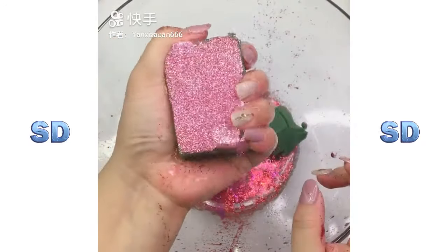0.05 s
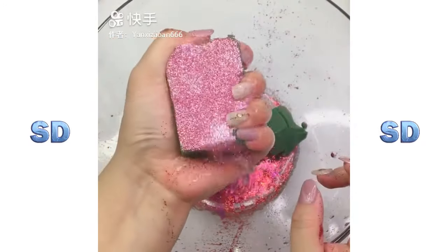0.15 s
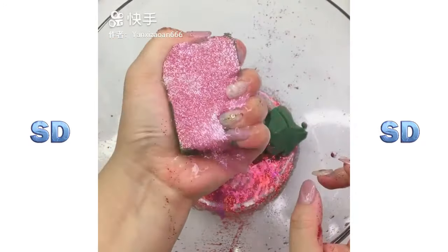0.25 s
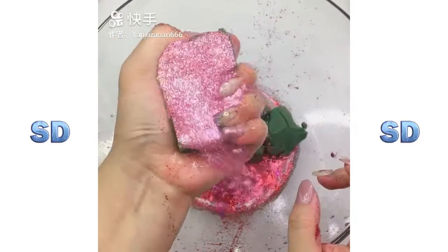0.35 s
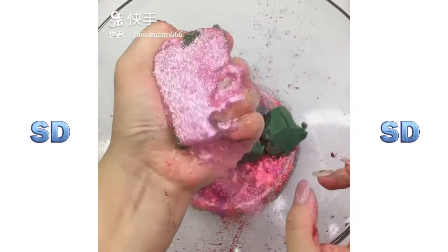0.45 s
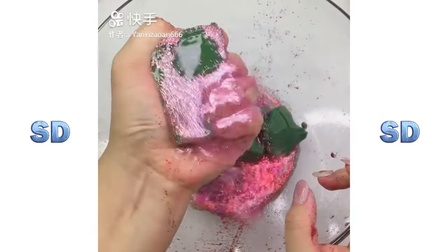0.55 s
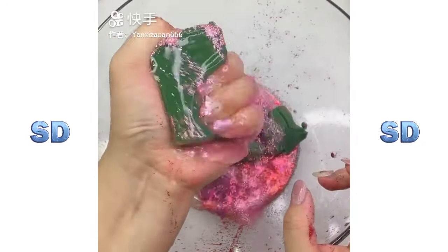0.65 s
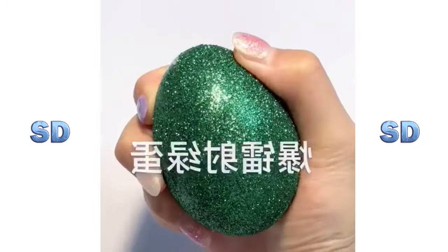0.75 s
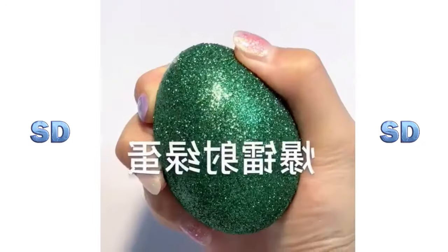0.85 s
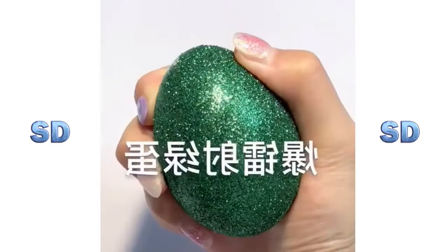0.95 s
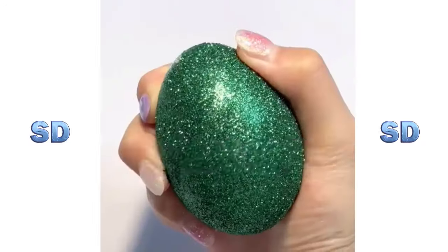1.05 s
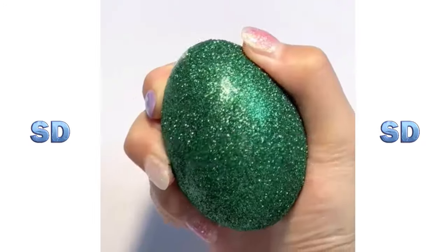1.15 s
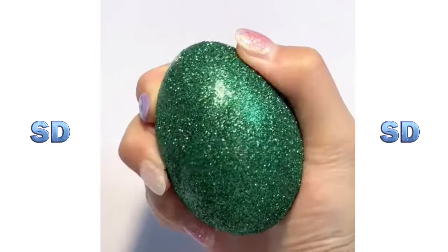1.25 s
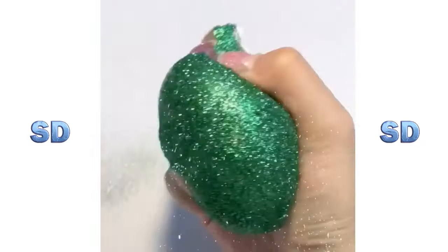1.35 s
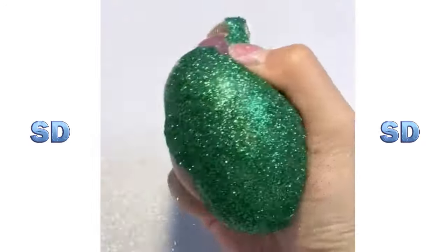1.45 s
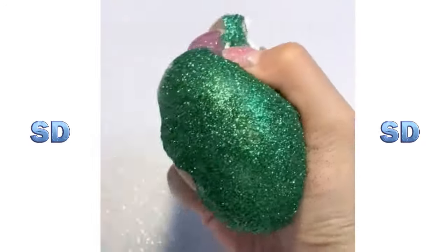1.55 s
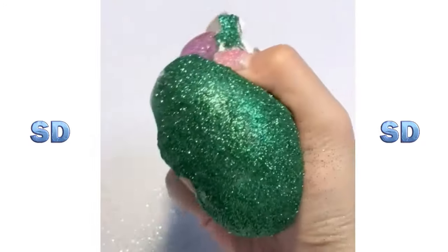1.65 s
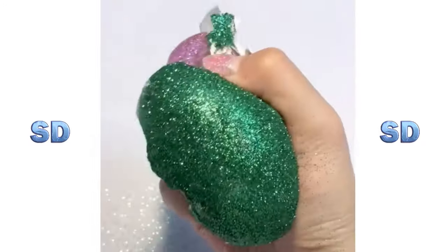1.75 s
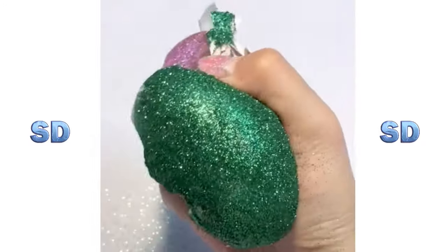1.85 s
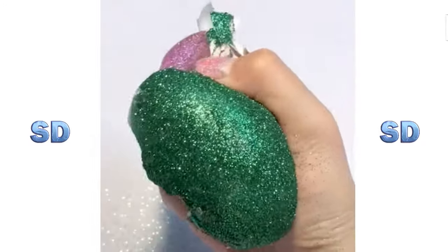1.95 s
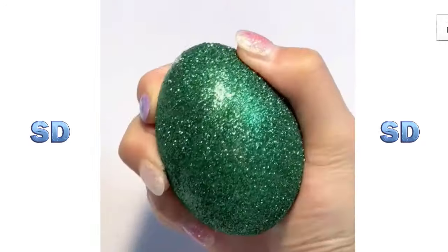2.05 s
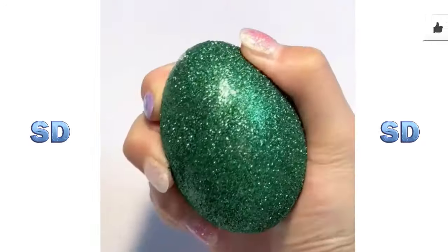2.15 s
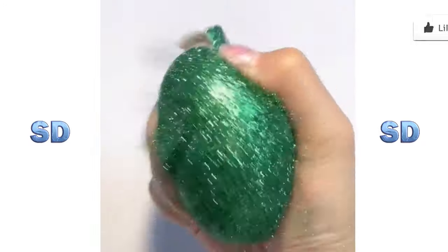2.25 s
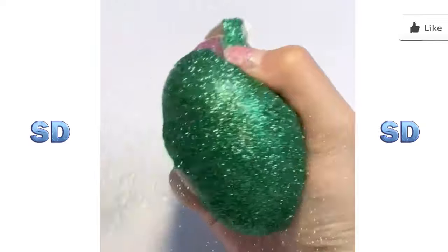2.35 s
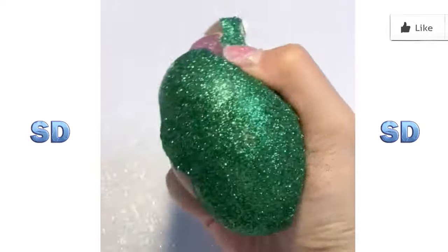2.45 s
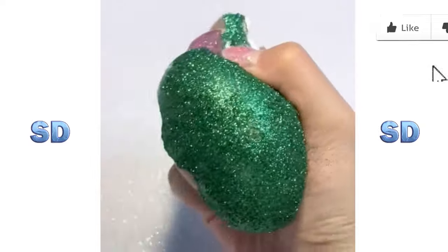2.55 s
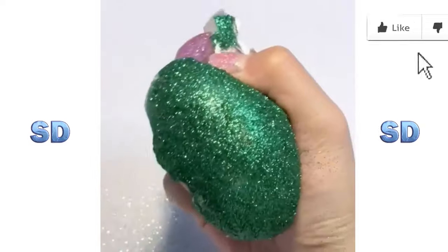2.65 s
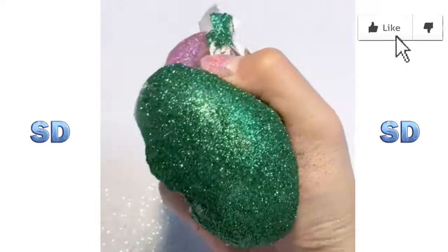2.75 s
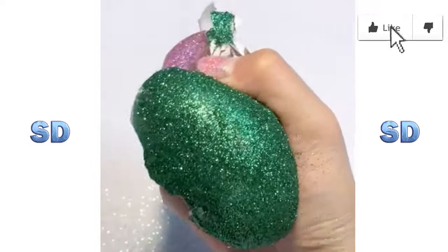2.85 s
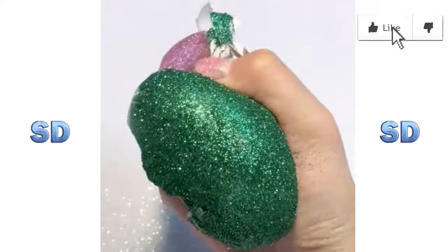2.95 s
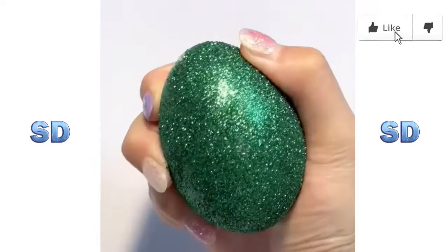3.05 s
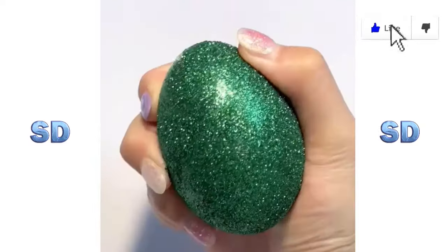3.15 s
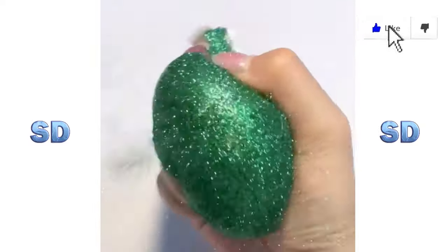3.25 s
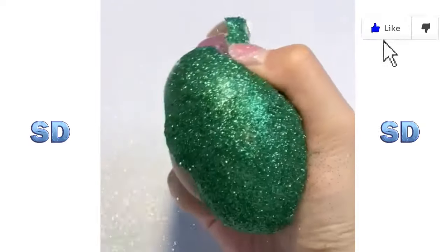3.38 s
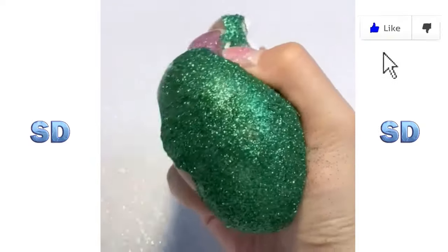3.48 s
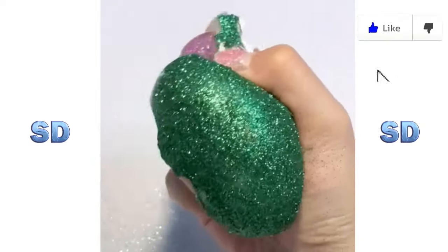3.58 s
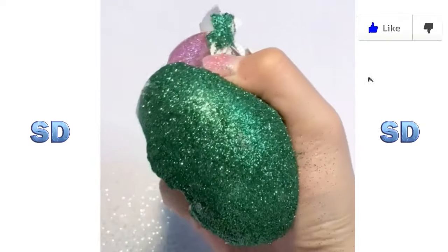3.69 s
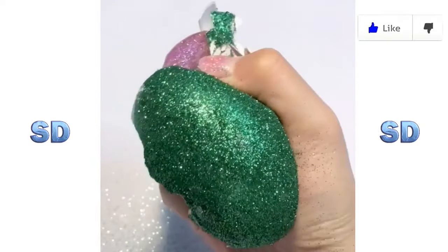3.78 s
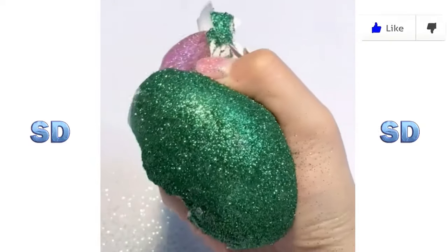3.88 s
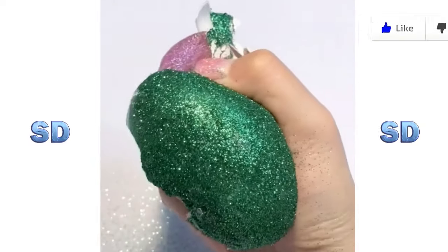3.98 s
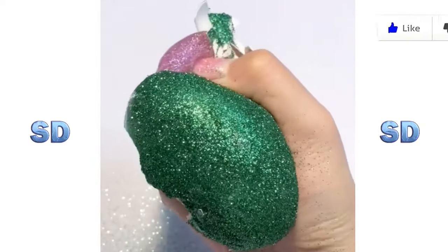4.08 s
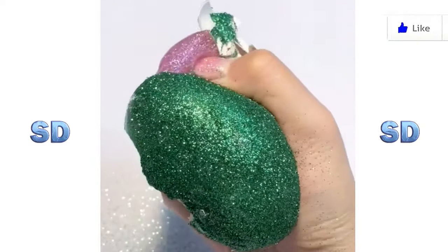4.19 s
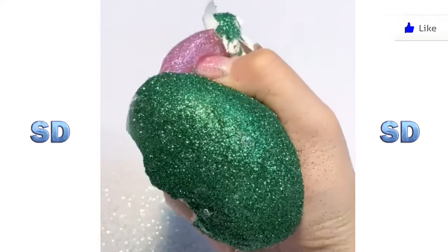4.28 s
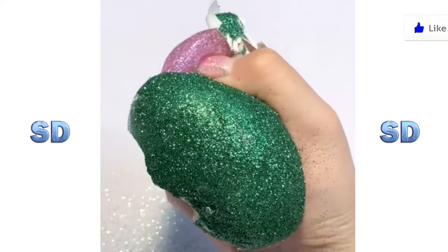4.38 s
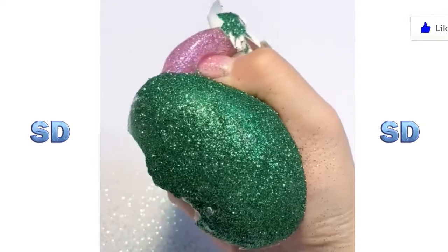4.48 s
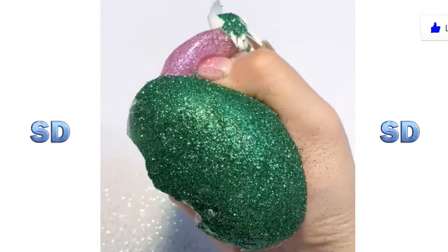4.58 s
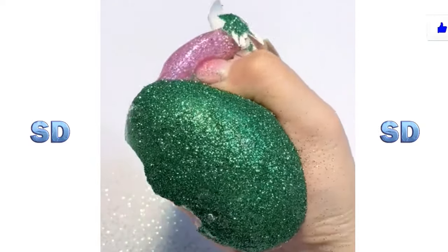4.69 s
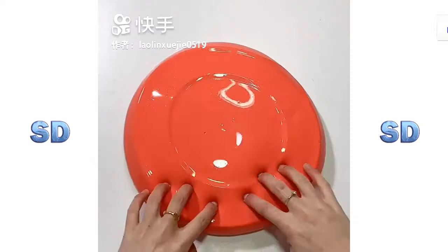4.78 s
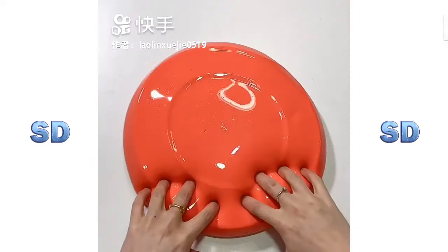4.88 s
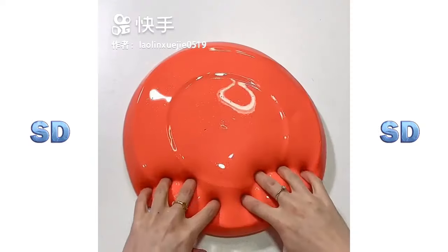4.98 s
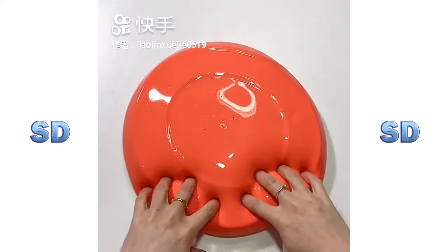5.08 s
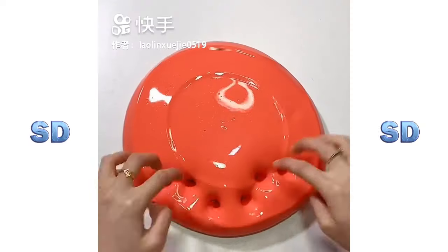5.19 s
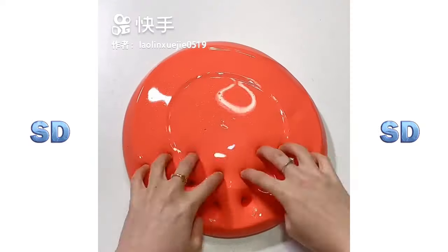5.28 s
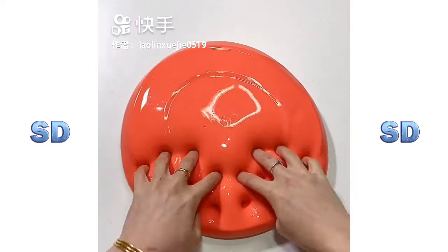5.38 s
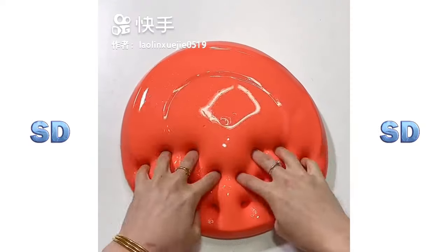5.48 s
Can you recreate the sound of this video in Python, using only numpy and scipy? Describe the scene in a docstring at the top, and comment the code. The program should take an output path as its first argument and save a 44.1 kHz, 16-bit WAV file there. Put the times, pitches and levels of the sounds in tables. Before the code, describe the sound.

Close-up slime squeezing: a brief wet crunch, three identical squelching bursts with sharp air pops, then a soft fingertip knock.

```python
"""At a table, very close up, a hand plays with slime in three scenes joined by cuts. First it crushes
a soft glittery block, which crunches as tiny films snap. Then it squeezes a putty egg until it bursts
with a wet rip and a thump, and air pockets pop as the slime oozes out. That squeeze plays three times
over, its loudest peaks held down by a limiter, before the last pops. At the end, fingertips push into
a flat sheet of slime and knock softly on the table."""
import sys
import numpy as np
from scipy import signal
from scipy.fft import rfft, irfft, next_fast_len
from scipy.io import wavfile
from scipy.ndimage import uniform_filter1d, minimum_filter1d

SR = 44100
rng = np.random.default_rng(int(sys.argv[2]) if len(sys.argv) > 2 else 0)


def transcribe(u):
    """Save the signal u as a 16-bit wav file named by the first command-line argument.

    u: samples, shape (n,) or (channels, n), limited to [-1, 1]; the rate is SR.
    q: integer samples, one column per channel.
    """
    v = np.clip(np.atleast_2d(u).T, -1, 1)
    q = np.round(v * 32767).astype(np.int16)
    wavfile.write(sys.argv[1], SR, q)


N = 243873
TIME = np.arange(N) / SR
CRUNCH_START_S, BLOCK_END_S = 0.405, 0.778
EGG_START_S, EGG_END_S = 0.99, 4.845
SQUELCH_START_S, SQUELCH_HZ = 1.296, 3280

# Air pockets popping. Each row: start in seconds, level in dB, pitch in Hz, wetness in dB
# (a wetter pop has more crack and less ring).
POCKET_POPS = [(0.3703, -24.5, 9300, -3), (0.4028, -24, 5400, -9), (0.4224, -29, 4500, 1),
               (0.4273, -17, 4350.0, -14), (0.4402, -11.5, 4610.0, -10), (0.453, -15, 4270, -15),
               (0.4626, -13, 4520.0, -15), (0.4886, -15, 9450.0, -15), (0.506, -14, 4570.0, 13),
               (0.512, -16.5, 4570.0, 2), (0.549, -11.5, 4440.0, -1), (0.615, -15, 8550, -8.5),
               (0.634, -10, 1680.0, -14.5), (0.638, -12, 6290.0, -8), (0.6667, -15.5, 2680, 0.5),
               (0.6738, -17.5, 2280.0, -8.5), (0.6924, -23, 9900, -12.5), (0.7202, -6.5, 2630.0, -26.5),
               (0.7478, -15, 3550.0, -4.5), (1.0821, -18.5, 3380.0, 1), (1.2852, -7, 3570.0, 9),
               (1.3996, -27, 3880.0, 2), (1.413, 3.5, 3140.0, 3), (1.512, -5, 3320.0, 1),
               (1.7357, -2, 3120.0, -2), (1.7519, -6.5, 1810.0, -3), (1.7666, -10, 1890.0, -5),
               (1.776, -6, 8910.0, 13), (1.801, -9, 2860.0, 10), (1.8276, -13, 3210.0, 1),
               (1.8387, -8, 3420.0, 14), (1.8454, 3, 3380.0, 0), (1.8597, -10.5, 9410.0, 15),
               (1.8928, -5, 3270.0, 9), (1.905, -5, 1770.0, -2), (1.934, -3.5, 7410.0, -6),
               (1.9573, -3, 2370.0, 7), (1.9655, -5.5, 7750.0, 16), (1.974, 2, 6520.0, -3),
               (1.982, -3, 7340.0, -8), (2.0029, -2, 2710.0, 2), (2.076, 6, 6590, -0.5),
               (2.0845, -7, 6770, -13), (2.1175, -16, 11500, -8), (2.131, -4.5, 8800, -7.5),
               (2.139, -4, 6780.0, -9.5), (2.168, -4.5, 8660.0, 1), (2.182, 2, 1850.0, 10),
               (2.1857, 20, 1590.0, 1.5), (2.2036, -6, 1830.0, 19), (2.216, -5, 6460.0, 4),
               (2.2417, -1.5, 8720.0, -3), (2.2732, 17.5, 1980.0, 3.5), (2.281, 3, 5560.0, -4),
               (4.2464, 13, 1980.0, 1), (4.2535, 8, 5560.0, 1.5), (4.2731, 5, 6520.0, 2.5),
               (4.2828, -2.5, 3220, -0.5), (4.2927, 26, 3190.0, 9), (4.3211, 14, 3320.0, 0),
               (4.3377, 1.5, 6760.0, 3), (4.364, -11, 3210.0, -4), (4.3922, -1, 3190.0, 5),
               (4.4003, -0.5, 3290.0, 11.5), (4.4092, -4, 3080.0, 3), (4.421, -9.5, 8510.0, 1.5),
               (4.4469, 14, 1080.0, 2), (4.4631, 7, 3190.0, 2.5), (4.4712, 12, 6830.0, 3.5),
               (4.4821, 6, 5400.0, -2.5), (4.4962, -5.5, 1920.0, -2.5), (4.515, -4, 6320, -8.5),
               (4.5488, -3.5, 1980, -7.5), (4.5679, -2.5, 3270.0, 1), (4.5875, 17.5, 1830.0, -6.5),
               (4.6072, -3.5, 4110.0, 2.5), (4.614, -4.5, 1890.0, -5), (4.6844, -9, 1940.0, 7),
               (4.698, -8.5, 1960.0, 7.5), (4.7205, 6, 8570.0, -4), (4.833, -16.5, 6440, 9),
               (5.3891, -13.5, 11710.0, 0.5), (5.4077, -8.5, 8640, 13)]
# The tone of the egg's crackle. Each row: frequency in Hz, relative level in dB.
EGG_TONE = [(300, -3.5), (600, -9.5), (1100, -2.5), (1900, -0.5), (3300, -8), (4700, -5.5), (7000, -2),
            (10000, -2.5), (13000, -0.5), (16000, -13.5)]
# The tone of the room's low rumble. Each row: frequency in Hz, relative level in dB.
ROOM_TONE = [(25, -34.5), (45, -6), (70, 2), (150, 3), (210, -7.5), (320, -6), (500, -20), (900, -27.5),
             (3000, -44)]


def pops(rows, attack_s=0.0004, pitch_rise=0.036, wobble_hz=260):
    """Each film snaps and tears; the air pocket behind it splats and rings with its neighbours."""
    # The tone of a tearing film. Each row: frequency in Hz, relative level in dB.
    tear_tone = [(200, 6), (600, -2.5), (1100, -2.5), (2000, 2.5), (3300, 3), (4800, 1), (8000, 3),
                 (12000, -2), (16000, -4.5)]
    out = np.zeros(N)
    tearing = coloured_noise(tear_tone)
    air, walls = rng.standard_normal(N), drift(per_s=1800)
    t = np.arange(SR // 20) / SR
    snap = resonance(signal.unit_impulse(len(t)), hz=980, width_hz=330)
    snap *= from_db(-6.5) / snap.max()
    spacings = rng.uniform(0.1, 0.35, (600, 2)) * [-1, 1]  # one lower neighbour, one higher
    for (start_s, db, hz, wet_db, t60_s), spacing in zip(rows, spacings):
        now = slice(round(start_s * SR), round(start_s * SR) + len(t))
        age = t / t60_s  # a "t60" is the time a sound takes to fade by 60 dB
        dying = from_db(-60 * age)
        wetness = min(1, from_db(wet_db + 6))  # wet pockets bend more and join their neighbours
        pitch = hz * (1 + pitch_rise * np.minimum(age, 1)) + wobble_hz * wetness * walls[now]
        phase = 2 * np.pi * np.cumsum(pitch) / SR
        neighbours = wetness * dying * np.sin(np.outer(1 + spacing, phase)).sum(axis=0)
        ring = from_db(-2) * dying * (np.sin(phase) + neighbours) / np.hypot(1, wetness)
        splat = rms_one(resonance(air[now], hz, width_hz=2650))
        crack = from_db(wet_db) * dying * (from_db(-6.5) * tearing[now] + from_db(-8) * splat)
        body = wetness * 980 / hz * snap  # big, low pockets snap the hardest
        onset = 1 - np.exp(-t / attack_s)
        out[now] += from_db(db) * (onset * (ring + crack) / np.hypot(1, from_db(wet_db)) + body)
    return out


def pockets():
    """List the pockets and add a fade time: big ones, loud ones and those in the block ring longer."""
    in_block = stray_pockets(crunch_gain(), CRUNCH_START_S, BLOCK_END_S, per_s=69, above_db=12,
                             spread_db=4.5, low_hz=3470, high_hz=13920, wet_db=-7.5)
    in_egg = stray_pockets(ooze_gain(), EGG_START_S, EGG_END_S, per_s=9.1, above_db=11,
                           spread_db=4, low_hz=2500, high_hz=12000, wet_db=-5.5)
    rows = np.vstack([POCKET_POPS, in_block, in_egg])
    start_s, db, hz, _ = rows.T
    base_t60_s = np.where(start_s < BLOCK_END_S, 0.018, 0.015)
    t60_s = base_t60_s * (3400 / hz) ** 0.05 * np.exp(0.0022 * db)
    return np.column_stack([rows, t60_s])


def stray_pockets(flow, start_s, end_s, per_s, above_db, spread_db, low_hz, high_hz, wet_db):
    """List small pockets that open at random, louder when more slime flows."""
    when, size, pitch = rng.random((300, 3))[:int(per_s * (end_s - start_s))].T
    times = start_s + when * (end_s - start_s)
    flow_db = 20 * np.log10(flow[(times * SR).astype(int)] + 1e-9)
    db = flow_db + above_db - spread_db * np.log(size + 0.05)
    hz = low_hz * (high_hz / low_hz) ** pitch
    return np.column_stack([times, db, hz, np.full(len(times), wet_db)])


def egg_burst(start_s=1.524, waver=0.022, wobble_hz=51):
    """The skin rips and air sputters out through froth, while the hollow throbs and the egg wobbles."""
    # The tone of the rip. Each row: frequency in Hz, relative level in dB.
    rip_tone = [(200, 0.5), (350, -0.5), (560, -2), (850, -0.5), (1400, -0.5), (2400, -2), (3200, 3),
                (4500, -4), (6500, -2.5), (9000, -2.5), (13000, -4), (16000, -9)]
    # The notes of the hollow inside the egg. Each row: pitch in Hz, relative level in dB.
    hollow_notes = [(104, -7.5), (123, 1), (146, -9.5), (175, -8.5), (206, -7.5), (283, -17)]
    froth = coloured(fizz(per_s=2500, spread_db=3.5, cycles=14), rip_tone)
    spray = rms_one(crackle(rip_tone, per_s=6900, spread_db=12, hiss_db=8) + 0.5 * froth)
    hollow = np.zeros(N)
    for hz, db in hollow_notes:
        pitch = hz * (1 + waver * drift(per_s=68))
        hollow += from_db(db) * np.sin(2 * np.pi * np.cumsum(pitch) / SR)
    rip = from_db(-5.5) * envelope(start_s, attack_s=0.004, hold_s=0.057, t60_s=0.28)
    throb = from_db(-16) * envelope(start_s, attack_s=0.08, hold_s=0.033, t60_s=0.36)
    wobble = from_db(-25) * envelope(start_s, attack_s=0.057, hold_s=0, t60_s=0.27)
    return rip * spray + throb * rms_one(hollow) + wobble * np.sin(2 * np.pi * wobble_hz * TIME)


def slips(run_s=0.0682, every_s=0.0078, wet_db=-8, t60_s=0.022):
    """Slime stutters between the fingers: list a quick run of pops that swells and fades."""
    age = np.arange(0, run_s, every_s)
    late, size, tuning = rng.standard_normal((40, 3))[:len(age)].T
    times = SQUELCH_START_S + age + 0.13 * every_s * late
    levels = -0.5 - 11 * (2 * age / run_s - 0.8) ** 2 + 2.5 * size
    pitches = SQUELCH_HZ * (1 + 0.014 * tuning)
    return [(start_s, db, hz, wet_db, t60_s) for start_s, db, hz in zip(times, levels, pitches)]


def finger_gap(popping, width_hz=337):
    """The narrow gap between the fingers rings with the pops, and rasps as slime is forced through."""
    rubbing = crackle(EGG_TONE, per_s=1200, spread_db=3.5, hiss_db=-10)
    rasp = rms_one(resonance(rubbing, SQUELCH_HZ, width_hz))
    rasp *= envelope(SQUELCH_START_S, attack_s=0.023, hold_s=0.044, t60_s=0.33)
    ringing = resonance(popping * egg_fade(), SQUELCH_HZ, width_hz)
    return from_db(-25) * rasp + from_db(-4.5) * ringing


def egg_ooze():
    """Slime creeps between the fingers with a squelch, while flesh and putty rumble as they move."""
    # The tone of the squeezing hand. Each row: frequency in Hz, relative level in dB.
    hand_tone = [(20, -15), (36, -3), (48, 3.5), (64, -4.5), (85, -6.5), (120, 0), (180, -4.5), (260, -10),
                 (500, -17.5), (1000, -24), (4000, -61)]
    films = crackle(EGG_TONE, per_s=4900, spread_db=2.5, hiss_db=7.5)
    squelch = from_db(3) * resonance(films, SQUELCH_HZ, width_hz=980)
    bubbles = from_db(-4) * fizz(per_s=350, spread_db=6, cycles=8)
    slime = rms_one(rms_one(films + squelch) + bubbles)
    hand = from_db(-34.5) * egg_fade() * coloured_noise(hand_tone)
    return np.hypot(ooze_gain(), trail_gain()) * slime + hand


def ooze_gain():
    """How loud the slime is as it flows out of the egg."""
    # The flow of slime. Each row: time in seconds, level in dB.
    flow = [(1.09, -44), (1.26, -42), (1.33, -22.5), (1.47, -43), (1.78, -36.5), (1.9, -41.5), (1.99, -31),
            (2.07, -39), (2.15, -32), (2.29, -35), (4.24, -27), (4.36, -28.5), (4.5, -31), (4.65, -38.5),
            (4.74, -35.5), (4.8, -43)]
    return from_db(np.interp(TIME, *np.transpose(flow))) * egg_fade()


def trail_gain(t60_s=0.28):
    """How loud the fizz is that each large pop of the egg leaves behind."""
    kicks = np.zeros(N)
    for start_s, db, _, _ in POCKET_POPS:
        kicks[round(start_s * SR)] = from_db(-33 + 0.45 * db) ** 2
    power = signal.lfilter([1], [1, -from_db(-120 / (t60_s * SR))], kicks + 1e-18)
    return np.sqrt(power) * egg_fade()


def egg_fade(fade_s=0.11):
    """The egg scene fades in and ends at a cut."""
    return np.clip((TIME - EGG_START_S) / fade_s, 0, 1) ** 2 * (TIME < EGG_END_S)


def block_crunch():
    """Tiny films and bubbles break in a fine, wet crunch as the block gives way."""
    # The tone of the crunch. Each row: frequency in Hz, relative level in dB.
    block_tone = [(400, -16), (1000, -13.5), (2000, 1), (3000, -5), (4500, -2), (6500, -4.5), (9000, -4.5),
                  (13000, -2), (16000, -11.5)]
    films = crackle(block_tone, per_s=3800, spread_db=19.5, hiss_db=2.5)
    bubbles = coloured(fizz(per_s=420, spread_db=5, cycles=9), block_tone)
    return crunch_gain() * rms_one(films + from_db(0.5) * bubbles)


def crunch_gain(tighten_s=0.22, give_way_s=0.02):
    """The grip tightens quietly, then the block gives way and keeps crunching."""
    grip = np.minimum(TIME / tighten_s, 1)
    giving = np.clip((TIME - CRUNCH_START_S) / give_way_s, 0, 1)
    return (from_db(-56) * grip + from_db(-38) * giving) * (TIME < BLOCK_END_S)


def sheet_press(touch_s=5.385, press_s=5.418):
    """Fingertips sink through the slime with a sticky hiss and knock on the table in a quiet room."""
    # The notes of the table. Each row: pitch in Hz, relative level in dB, seconds to fade by 60 dB.
    table_notes = [(148, -15, 0.17), (232, -5.5, 0.49), (324, -1, 0.2), (448, 1.5, 0.067), (735, 3, 0.089),
                   (840, -17, 0.11), (1030, -5, .06), (1250, -23, 0.13)]
    sticky = from_db(-31) * envelope(touch_s, attack_s=0.017, hold_s=0.021, t60_s=0.4)
    # The tone of the sticky sheet. Each row: frequency in Hz, relative level in dB.
    sheet_tone = [(300, -5), (500, 0.5), (1100, 1), (1600, -4), (3000, -10.5), (5000, -9), (9000, -8),
                  (13000, -12), (16000, -22)]
    films = crackle(sheet_tone, per_s=3900, spread_db=0, hiss_db=3)
    t = np.maximum(TIME - press_s, 0)
    knock = sum((-1) ** k * from_db(db - 60 * t / t60_s) * np.sin(2 * np.pi * hz * t)
                for k, (hz, db, t60_s) in enumerate(table_notes))
    thud = from_db(-41) * envelope(press_s, attack_s=0.0054, hold_s=0, t60_s=0.43)
    room = from_db(-55.5) * (TIME > EGG_END_S)
    return from_db(-26.5) * knock + sticky * films + (thud + room) * coloured_noise(ROOM_TONE)


def room_noise():
    """The room hisses and rumbles faintly behind the block."""
    # The tone of the room's hiss. Each row: frequency in Hz, relative level in dB.
    hiss_tone = [(240, -37), (400, 0), (567, -5), (701, -6.5), (867, -7), (2190, -8), (2620, -6),
                 (15000, -20.5)]
    hiss = from_db(-50.5) * coloured_noise(hiss_tone)
    rumble = from_db(-48) * coloured_noise(ROOM_TONE)
    return (hiss + rumble) * (TIME < BLOCK_END_S)


def crackle(tone, per_s, spread_db, hiss_db):
    """Countless tiny films snap at random and merge into a hiss."""
    sizes = from_db(spread_db * np.minimum(rng.exponential(1, N), 4)) * rng.choice([-1, 1], N)
    snaps = rms_one(sizes * (rng.random(N) < per_s / SR))
    return coloured(snaps + from_db(hiss_db) * rng.standard_normal(N), tone)


def fizz(per_s, spread_db, cycles):
    """Pinhead bubbles open at random, each ringing a few cycles at its own pitch."""
    sizes = from_db(spread_db * np.minimum(rng.exponential(1, N), 3))
    kicks = sizes * (rng.random(N) < per_s / SR)
    pitches, chosen = np.geomspace(1500, 14000, 24), rng.integers(0, 24, N)
    rings = (resonance(kicks * (chosen == k) + 1e-18, hz, hz / cycles) for k, hz in enumerate(pitches))
    return rms_one(sum(rings))


def envelope(start_s, attack_s, hold_s, t60_s):
    """A level that rises in a straight line, holds, then falls 60 dB every t60_s seconds."""
    t = TIME - start_s
    return np.clip(t / attack_s, 0, 1) * from_db(-60 * np.maximum(t - attack_s - hold_s, 0) / t60_s)


def resonance(x, hz, width_hz):
    """Let through a band of frequencies around hz; a narrower band rings longer."""
    r = np.exp(-np.pi * width_hz / SR)
    feedback = [1, -2 * r * np.cos(2 * np.pi * hz / SR), r * r]
    return signal.lfilter(np.array([1, 0, -1]) * (1 - r * r) / 2, feedback, x)


def coloured(x, tone):
    """Shape the lows and highs of x with a tone table, then set its average level to 1."""
    hz, db = np.transpose(tone)
    size = next_fast_len(N)
    bins = np.maximum(np.arange(size // 2 + 1) * SR / size, 1)
    shape = from_db(np.interp(np.log(bins), np.log(hz), db, left=-80, right=-80))
    return rms_one(irfft(rfft(x, size) * shape, size)[:N])


def coloured_noise(tone):
    """Steady noise shaped by a tone table."""
    return coloured(rng.standard_normal(N), tone)


def drift(per_s):
    """Glide between random values, per_s of them each second."""
    return np.interp(TIME * per_s, np.arange(8000), rng.standard_normal(8000))


def from_db(db):
    """Turn decibels into a number to multiply by."""
    return 10 ** (np.asarray(db) / 20)


def rms_one(x):
    """Scale x so that its average level (root mean square) is 1."""
    return x / np.sqrt(np.mean(x ** 2) + 1e-20)


def limiter(x, ceiling_db, window_s):
    """Turn the level down just ahead of each peak and straight back up after it."""
    size = max(int(window_s * SR), 3)
    needed = np.minimum(1, from_db(ceiling_db) / (np.abs(x).max(axis=0) + 1e-9))
    return x * uniform_filter1d(minimum_filter1d(needed, size), size)


def scene(repeat_from_s=1.315, repeat_s=0.97525):
    """Block, egg, then sheet, the same in both ears; the squeeze plays three times in a row."""
    out = pops(np.vstack([slips(), pockets()]))
    out += finger_gap(out) + block_crunch() + room_noise() + egg_ooze() + egg_burst() + sheet_press()
    out *= (TIME < BLOCK_END_S) | (TIME > EGG_START_S)  # silence between the first two scenes
    start, length = round(repeat_from_s * SR), round(repeat_s * SR)
    out[start:start + 3 * length] = np.tile(out[start:start + length], 3)
    return np.array([out, out])


def record(dry, cutoff_hz=15800):
    """The limiter flattens loud pops, and the highest treble is cut away."""
    held = limiter(dry, ceiling_db=-7.5, window_s=0.00042)
    return signal.sosfilt(signal.ellip(10, 0.2, 80, cutoff_hz, fs=SR, output="sos"), held)


dry = scene()
out = record(dry)
transcribe(out)
```